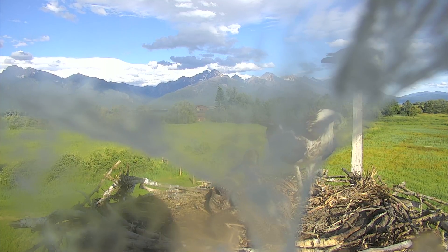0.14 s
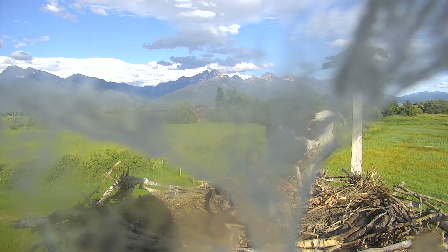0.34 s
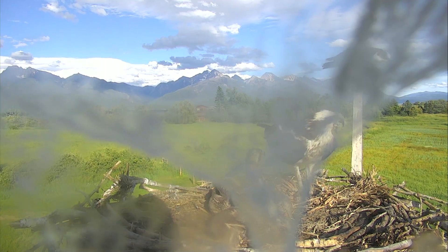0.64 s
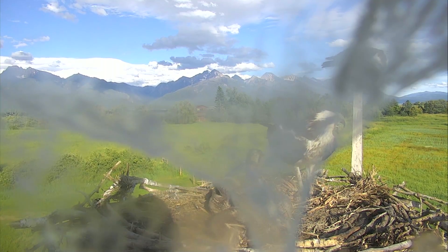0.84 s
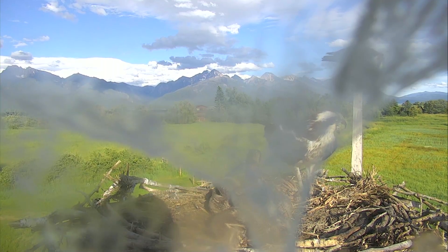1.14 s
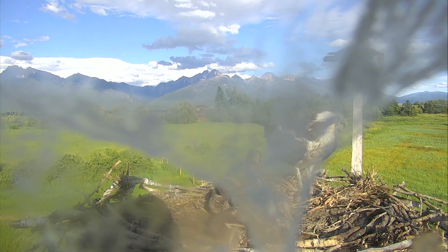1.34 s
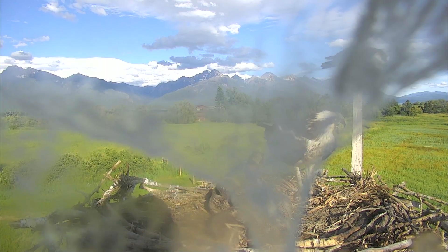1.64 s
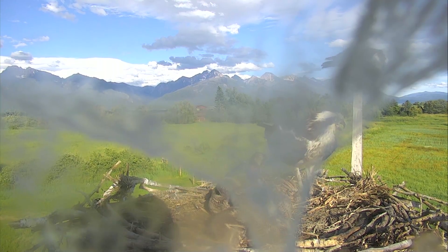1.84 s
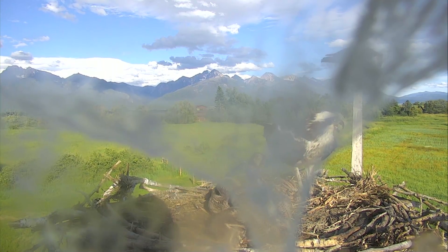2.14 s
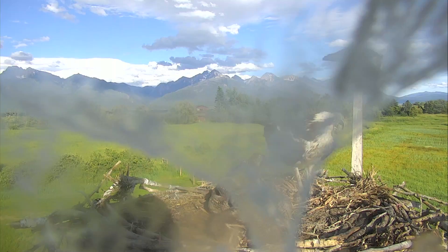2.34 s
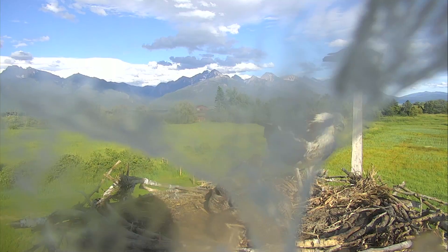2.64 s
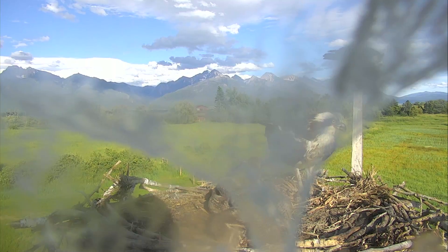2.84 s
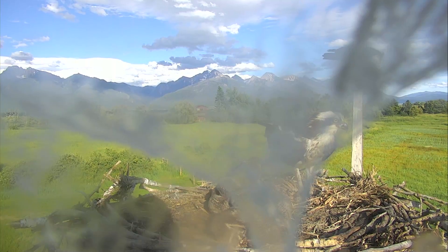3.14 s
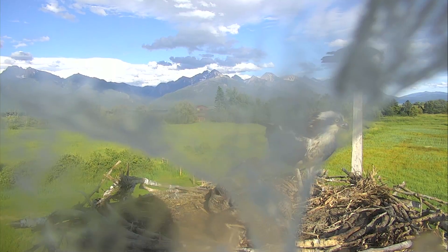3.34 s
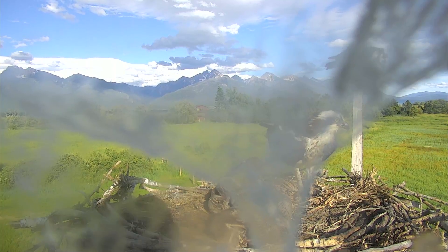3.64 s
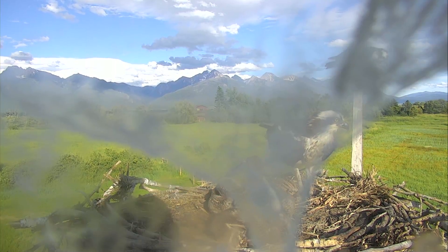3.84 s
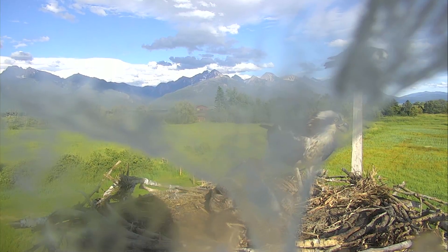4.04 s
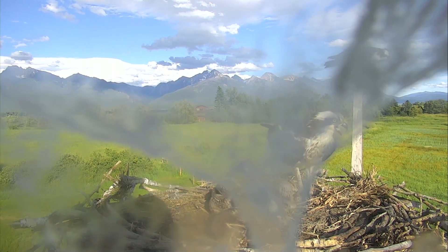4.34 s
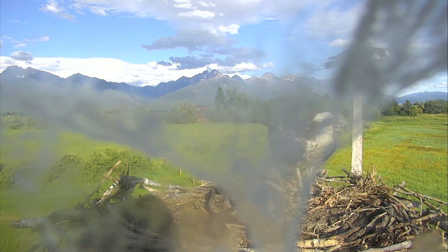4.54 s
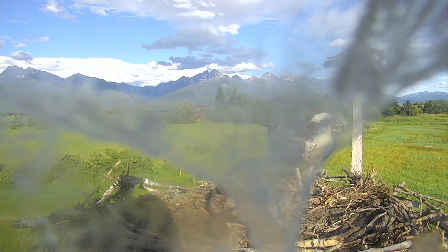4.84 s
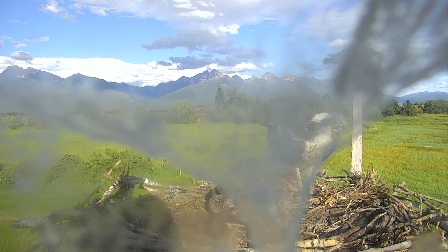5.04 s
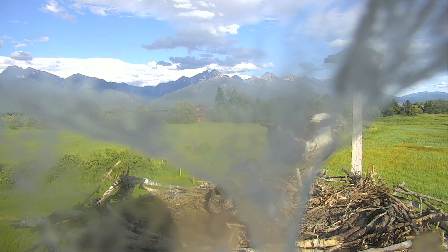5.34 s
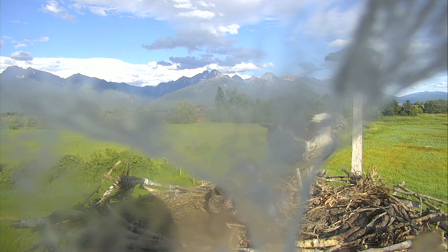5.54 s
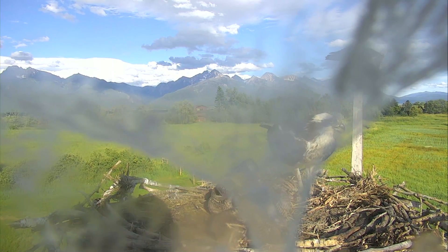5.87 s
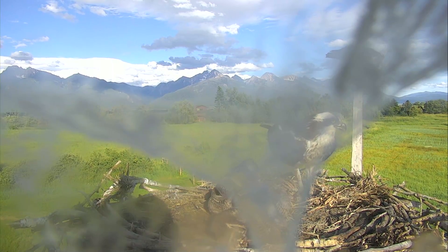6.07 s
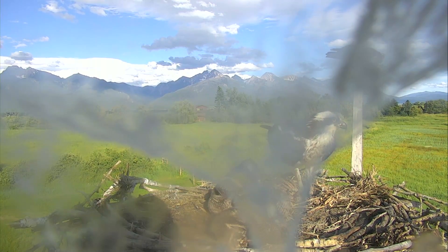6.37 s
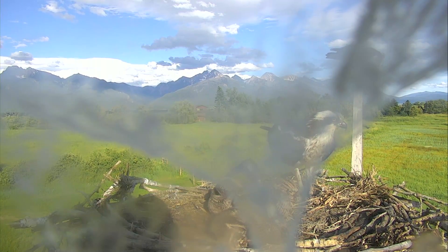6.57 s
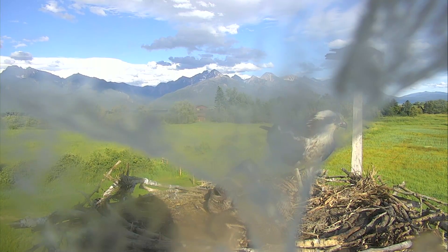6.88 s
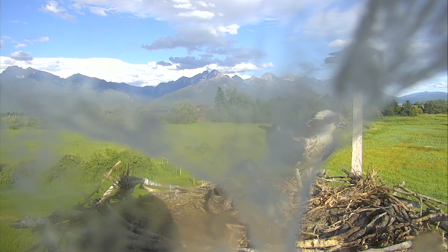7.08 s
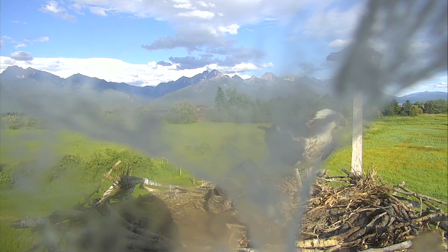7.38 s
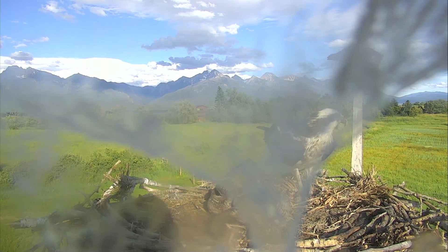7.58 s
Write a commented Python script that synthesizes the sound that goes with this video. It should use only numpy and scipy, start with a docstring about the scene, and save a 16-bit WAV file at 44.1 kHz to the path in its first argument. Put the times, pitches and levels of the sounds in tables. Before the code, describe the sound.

Piercing whistled raptor chirps come in two rapid bouts, the second shorter, separated and followed by tiny twig ticks, far small birds and soft wind rumble.

```python
"""A bird of prey on its nest whistles a first bout of sharp chirps, close by in open country, over faint wind.
In the pause, dry twigs tick and small birds peep far off; then comes a second, shorter bout.
After it, ticks and peeps return, with thin far whistles and one soft low rush of noise.
The chirps add a whistle, its overtones, half-pitch lines and rasp, with pitch leaping between two registers.
Ticks are noise bursts ringing thin sticks, far birds are gliding sines, and wind is shaped random noise."""
import sys
import numpy as np
from scipy import signal
from scipy.fft import rfft, irfft
from scipy.io import wavfile
from scipy.ndimage import uniform_filter1d

SR = 44100
rng = np.random.default_rng(int(sys.argv[2]) if len(sys.argv) > 2 else 0)


def generate_wav(sig):
    """Save sig (samples, or channels by samples) to the path in sys.argv[1] as 16-bit PCM at SR."""
    pcm = np.round(np.clip(np.atleast_2d(sig).T, -1, 1) * 32767).astype(np.int16)
    wavfile.write(sys.argv[1], SR, pcm)


N = 340011

# How the wind changes. Each row: time in seconds, rumble level in dB, open-air wash level in dB before a 1 dB lift.
WIND_LEVELS = [(0.0, -50.5, -61.5), (1.22, -52.5, -62.5), (7.71, -58, -66)]
# Colour of the rumble and of the wash. Each row: frequency in Hz, relative strength in dB per Hz.
RUMBLE_COLOUR = [(12, -24), (25, -1.5), (97, 3.5), (160, -8.5), (260, -22.5), (400, -55)]
WASH_COLOUR = [(120, -32), (200, -0.5), (350, -4.5), (500, -4.5), (630, -7.5), (970, -7.5), (1300, -11.5),
               (2100, -11), (2900, -13), (3400, -23), (4900, -19), (5400, -24.5), (10000, -29.5),
               (17000, -43.5)]
HUM_HZ, HUM_DB = 955, -76  # a thin, nearly steady tone in the wash; the level is its peak

# One soft low rush. In order: middle in seconds, half length in seconds,
# a list of bands (centre in Hz, width in Hz, level in dB), level in dB at its middle.
RUSH = (6.17, 0.27, [(775, 360, 0)], -66)

# Far whistles. Each row: start in seconds, length in seconds, start, middle and end pitch in Hz, relative level in dB.
FAR_WHISTLES = [(6.233, 0.095, 1900, 2365, 1450, -68), (6.565, 0.05, 1750, 1680, 1450, -74),
                (6.79, 0.05, 5550, 5450, 5300, -84)]
# Runs of high peeps. Each row: start in seconds, number of peeps.
PEEP_RUNS = [(2.969, 2), (5.903, 1), (6.134, 1), (6.224, 1), (6.454, 3), (6.849, 2), (7.184, 3)]
# A single peep: length in seconds, start, middle and end pitch in Hz, relative level in dB.
PEEP_SHAPE = (.022, 5800, 5720, 5620, -82)
PEEP_STEP_S = 0.048  # from the start of one peep to the next

# Twig ticks. Each row: time in seconds, relative peak level in dB.
TWIG_TICKS = [(2.6244, -49), (2.6503, -48), (2.692, -45.5), (3.053, -48), (3.0959, -49), (3.3167, -53),
              (3.477, -55), (3.5194, -46), (3.5342, -46), (5.813, -51), (5.8504, -53), (5.8706, -51),
              (6.188, -45), (6.2238, -55), (6.3116, -52), (6.3298, -49.5), (6.3604, -49), (6.397, -53),
              (6.43, -45.5), (6.7451, -52), (6.769, -51)]
# Ringing of a thin dry stick. Each row: frequency in Hz, width in Hz, level in dB.
TWIG_RESONANCES = [(4436, 2500, -8), (7100, 2700, -2), (9730, 6300, -5.5), (13480, 4500, -11)]

# Windpipe and open beak. Each row: frequency in Hz, width in Hz, level in dB.
THROAT_RESONANCES = [(1364, 328, -14), (2416, 170, -1.5), (2640, 433, -4.5), (3450, 560, -10.5),
                     (4220, 100, -28), (4920, 400, -13.5), (5370, 95, -14.5), (6440, 560, -11),
                     (7980, 400, -13.5), (8770, 440, -22), (9470, 470, -25.5), (10250, 1100, -30.5),
                     (10800, 150, -30.5), (12200, 500, -41), (14300, 700, -47), (15600, 1500, -37.5)]
# Side branches of the throat weaken narrow bands. Each row: frequency in Hz, width in Hz.
THROAT_NOTCHES = [(3170, 350), (4480, 510), (5290, 260), (6080, 400), (7350, 200), (8620, 440)]
# Overtones against the whistle, strong in the low register.
# Each row: pitch in Hz, then the 2nd, 3rd, 4th and 5th harmonic in dB, before the lift in steady spells.
OVERTONE_LEVELS = [(1900, -15.5, -19.5, -33, -45.5), (2110, -13, -6.5, -21.5, -35.5),
                   (2180, -17, -7, -28, -38.5), (2335, -16.5, -33.5, -39.5, -54),
                   (2500, -24.5, -27.5, -44.5, -56), (2670, -31, -28, -44, -58.5),
                   (2665, -25, -24, -42.5, -60.5), (2740, -22.5, -34.5, -42.5, -58),
                   (2858, -19.5, -29.5, -42.5, -55.5), (2845, -21, -26.5, -46.5, -52)]
# The rasp grows in the upper register. Each row: pitch in Hz, relative rasp in dB.
RASP_BY_PITCH = [(2150, -18), (2300, -7.5), (2600, -2.5), (2900, -4.5)]

# Long chirps swell, sag and swell again. Each row: start in seconds, leap up in seconds, opening level in dB,
# crest in seconds, its Hz, its dB, steady until in seconds, relative half-pitch level in dB, relative rasp in dB,
# sag in seconds, its Hz, its dB, second crest in seconds, its Hz, its dB, leap down in seconds.
LONG_CHIRPS = [(0.109, 0.126, -22.5, 0.17, 2913, -21, 0.18, -18.5, -30, 0.2, 2696, -24, 0.31, 2895, -20.5, 0.347),
               (0.463, 0.48, -22.5, 0.515, 2879, -19.5, 0.54, -20.5, -29, 0.563, 2780, -26, 0.65, 2913, -21, 0.703),
               (0.802, 0.82, -20, 0.858, 2928, -20, 0.88, -18.5, -28, 0.89, 2830, -22.5, 0.962, 2918, -20, 0.997),
               (1.095, 1.111, -21, 1.15, 2865, -17.5, 1.176, -21.5, -30.5, 1.174, 2713, -22.5, 1.255, 2862, -20.5, 1.321),
               (1.433, 1.448, -23, 1.491, 2822, -19.5, 1.5, -21.5, -29, 1.544, 2673, -26, 1.72, 2854, -21.5, 1.766),
               (1.899, 1.916, -24.5, 1.952, 2835, -19.5, 1.969, -21.5, -29.5, 2.007, 2580, -27.5, 2.07, 2830, -21.5, 2.137),
               (2.254, 2.271, -23.5, 2.305, 2830, -19, 2.319, -20.5, -29, 2.346, 2678, -25, 2.54, 2850, -20.5, 2.577),
               (4.317, 4.332, -23, 4.371, 2700, -16.5, 4.395, -35.5, -31.5, 4.407, 2578, -23, 4.47, 2702, -21, 4.511),
               (4.603, 4.621, -23, 4.66, 2777, -18, 4.666, -25.5, -31, 4.7, 2610, -25.5, 4.79, 2825, -19.5, 4.839),
               (5.136, 5.155, -22, 5.192, 2842, -16, 5.26, -28.5, -31, 5.222, 2773, -20.5, 5.295, 2885, -18.5, 5.328),
               (5.43, 5.449, -20, 5.483, 2860, -17, 5.5, -29.5, -30.5, 5.516, 2790, -24, 5.685, 2877, -19, 5.746)]
# Short chirps are one swell. Each row: start in seconds, leap up in seconds, opening level in dB,
# crest in seconds, its Hz, its dB, steady until in seconds, relative half-pitch level in dB, relative rasp in dB,
# leap down in seconds, closing level in dB, closing pitch in Hz, pitch after the leap down in Hz, end in seconds.
SHORT_CHIRPS = [(-0.09, -0.075, -22, 0.002, 2720, -19, -0.02, -30, -36, 0.015, -22, 2500, 2240, 0.027),
                (3.981, 3.982, -38, 4.031, 2518, -20.5, 4.062, -36, -33, 4.067, -31, 2330, 2290, 4.076),
                (4.144, 4.157, -27, 4.205, 2665, -16.5, 4.23, -32, -37, 4.244, -28, 2400, 1930, 4.254),
                (4.944, 4.963, -24, 5.003, 2773, -18, 5.019, -28, -29, 5.033, -27, 2610, 2200, 5.047)]
# Drops into the low register at the sag. Each row: from in seconds, its Hz, its dB, to in seconds, its Hz, its dB,
# pitch on return in Hz, relative half-pitch level in dB.
REGISTER_BREAKS = [(0.567, 2320, -26.5, 0.602, 2390, -23, 2818, -27),
                   (1.546, 2350, -25.5, 1.584, 2344, -24.5, 2737, -36),
                   (2.009, 2275, -29.5, 2.039, 2350, -23, 2796, -36),
                   (5.23, 2310, -27, 5.273, 2398, -19.5, 2870, -36),
                   (5.518, 2315, -26, 5.617, 2360, -21.5, 2766, -29)]
# Low-register opening. Each row: share of its length, share of the crest pitch, highest level in dB.
LEAD_IN_PATH = [(0, 0.71, -56), (0.4, 0.725, -31.5), (1, 0.81, -24.5)]
# Low register again at the end, sliding down; TAIL_DB is the loudest it may begin
TAIL_HZ, TAIL_DB, TAIL_S, TAIL_HZ_PER_S, TAIL_FALL_DB = 2236, -26, 0.017, 26000, 20
SCOOP_HZ, SCOOP_S, RISE_HZ = 165, 0.006, 90  # pitch slides up after the leap, then climbs to the crest
DROOP_HZ, DROOP_DB, DROOP_S, EASE_HZ = 330, 4.5, 0.009, 50  # pitch and level give way before the leap down
BOW_HZ, BOW_DB, BOW_BACK = 1.7, 1.9, 1.7  # roundness of the swells (1 = straight)
SETTLE_S = 0.011  # the steady spell starts this long after the leap up
SLIP_HZ, SLIP_S = 240, 0.005  # pitch slips just before a break and curls up at its end
LATE_HALF_DB, LATE_HALF_S = -6.5, 0.04  # the half pitch returns faintly near the end of a long chirp


def gain_of(db):
    """Turns decibels into amplitude."""
    return 10 ** (np.asarray(db) / 20)


def evened(x):
    """Scales a sound to an average (rms) strength of 1."""
    return x / np.sqrt(np.mean(x ** 2) + 1e-20)


def read(points, hz):
    """Reads a curve between its points, along a log-frequency axis."""
    f, value = np.transpose(points)
    return np.interp(np.log(hz + 1), np.log(f + 1), value)


def add(mix, s, sound):
    """Mixes a sound in at s seconds, or at the very start if s is negative."""
    part = mix[max(round(s * SR), 0):][:len(sound)]
    part += sound[:len(part)]


def response(modes, hz):
    """Sums resonances, each applied twice so that the valleys between them stay dark."""
    return sum(gain_of(db) / (1 + 2j * (hz - f) / w) ** 2 for f, w, db in modes)


def coloured(x, shape):
    """Passes a sound through a frequency response."""
    size = 2 * len(x)  # silence after the sound leaves room for ringing
    hz = np.fft.rfftfreq(size, 1 / SR)
    return irfft(rfft(x, size) * shape(hz))[:len(x)]


def wander(count, size):
    """Draws a smooth random curve, scaled to rms 1 before it is cut to length."""
    drawn = rng.standard_normal(max(count, SR // 2))
    smooth = uniform_filter1d(uniform_filter1d(drawn, size), size)
    return evened(smooth)[:count]


def air(shape, patchy_db):
    """Moving air: random short-time spectra whose strength drifts in patches."""
    frames, hz = N // 512 + 5, np.fft.rfftfreq(2048, 1 / SR)
    a, b, patches = rng.standard_normal((frames, 1025, 3)).T
    patches = uniform_filter1d(patches, size=14, axis=0)  # across frequency
    patches = evened(uniform_filter1d(patches, size=6, axis=1))  # across time
    spectra = (a + 1j * b) * gain_of(read(shape, hz)[:, None] + patchy_db * patches)
    return evened(signal.istft(spectra, nperseg=2048, noverlap=1536)[1][:N])


def wind():
    """Lumpy rumble on the microphone, a thin tone, and a wide wash of moving air."""
    s, rumble_db, wash_db = np.transpose(WIND_LEVELS)
    t = np.arange(N) / SR
    rumble = gain_of(np.interp(t, s, rumble_db)) * air(RUMBLE_COLOUR, patchy_db=2.5)
    hum_hz = HUM_HZ + 4 * wander(N, size=2000)
    hum = gain_of(HUM_DB) * np.sin(2 * np.pi * np.cumsum(hum_hz) / SR)
    wash = gain_of(np.interp(t, s, wash_db) + 1.0) * air(WASH_COLOUR, patchy_db=0.94)
    return rumble + hum + wash


def rush():
    """A soft low band of noise that swells and fades once."""
    middle, half_s, band, db = RUSH
    noise = evened(coloured(rng.standard_normal(N), lambda hz: response(band, hz)))
    t = np.arange(N) / SR
    return gain_of(db) * np.exp(-((t - middle) / half_s) ** 2) * noise


def far_birds():
    """Thin gliding whistles and short high peeps, each a sine that fades in and out."""
    out = np.zeros(N)
    peeps = [(s + k * PEEP_STEP_S, *PEEP_SHAPE) for s, count in PEEP_RUNS for k in range(count)]
    for s, length, a, b, c, db in FAR_WHISTLES + peeps:
        u = np.linspace(0, 1, round(length * SR))
        hz = a + (4 * b - 3 * a - c) * u + (2 * a + 2 * c - 4 * b) * u ** 2  # arch through three pitches
        note = np.sin(np.pi * u) * np.sin(2 * np.pi * np.cumsum(hz) / SR)
        add(out, s, gain_of(db + 6.5) * note)
    return out


def twig(hz):
    """Ring of a thin dry stick, as a sum of resonances."""
    return response(TWIG_RESONANCES, hz)


def twigs():
    """Dry ticks, each a tiny noise burst ringing thin sticks, plus single stray taps at random times."""
    bursts = rng.standard_normal((len(TWIG_TICKS), 300)) * np.exp(-np.arange(300) / 19.0)
    out = np.zeros(N)
    for (s, db), burst in zip(TWIG_TICKS, bursts):
        tick = coloured(burst, twig)
        add(out, s, gain_of(db + 2.5) * tick / abs(tick).max())
    stray = (rng.random(N) < 9. / SR) * rng.standard_normal(N)  # about nine a second
    return out + gain_of(-65.0) * coloured(stray, twig)


def meadow(x):
    """Faint late returns from trees and ground: sparse echoes that die away."""
    taps = np.zeros(SR)
    at = np.arange(1200, SR - 20, 20) + rng.integers(0, 20, (SR - 1201) // 20)
    taps[at] = rng.choice([-1., 1.], len(at)) * gain_of(-60 * at / SR / .65)  # 60 dB down in 0.65 s
    return signal.fftconvolve(x, taps / np.linalg.norm(taps))[:N]


def throat(hz):
    """Resonances of the throat, weakened in narrow bands by its side branches."""
    notches = [1 - .93 / (1 + 2j * (hz - f) / w) for f, w in THROAT_NOTCHES]
    return response(THROAT_RESONANCES, hz) * np.prod(notches, axis=0)


def chirp(t, db, pitch, steady, rasp_db, half):
    """One vibrating membrane makes the whistle, overtones and half-pitch lines, and leaks air as rasp."""
    count = len(t)
    level_db = uniform_filter1d(db, size=90)
    hz = uniform_filter1d(pitch, size=50)
    hoarse = gain_of(rasp_db + 23 + read(RASP_BY_PITCH, hz) - 3.7 * steady)  # how unsteady the vibration is
    shake = hoarse * gain_of(-9 * steady)  # the whistle itself smooths out in steady spells
    jitter = 0.549 * wander(count, size=70) + 1.1 * wander(count, size=250)
    phase = 2 * np.pi * np.cumsum(hz) / SR + shake * jitter
    tone = (1 + 0.42 * shake * wander(count, size=70)) * np.cos(phase)

    blur = 1 + 0.8 * hoarse * wander(count, size=45)  # uneven strength of the overtones
    at, *orders_db = np.transpose(OVERTONE_LEVELS)
    orders_db = orders_db + [orders_db[-1] - 5.0]  # the 6th harmonic follows the 5th
    for k, order_db in enumerate(orders_db, start=2):
        overtone_db = np.interp(hz, at, order_db) + 2.3 * k * steady
        tone += blur * gain_of(overtone_db) * np.sin(k * phase)

    # a doubled period puts extra lines halfway between the harmonics
    for k in range(6):
        order = k + .5
        colour = abs(response(THROAT_RESONANCES, order * hz)) ** 0.61
        tone += half * gain_of(12.0 - 1.5 * k) * colour * np.cos(order * phase)

    flutter = gain_of(2.2 * wander(count, size=300))  # the leak comes and goes
    puffs = flutter * (1 + .8 * np.cos(phase)) * rng.standard_normal(SR // 2)[:count]  # air leaks once a cycle
    rasp = hoarse * evened(coloured(puffs, throat))
    fade = np.minimum(1, (t[-1] - t) / 0.0011)
    return np.sqrt(2) * gain_of(level_db) * (tone + 0.61 * rasp) * fade


def spell(t, a, b):
    """1 between times a and b, with soft edges."""
    return np.clip(np.minimum(t - a, b - t) / .015 + .5, 0, 1)


def swell(t, low_s, low, top_s, top, bow):
    """Rounded climb from a low point to a top, either way in time."""
    away = np.clip((t - top_s) / (low_s - top_s), 0, 1)
    return top + (low - top) * away ** bow


def phrase(start, up, open_db, crest, crest_hz, crest_db, calm, down, tail_hz, end, after_hz, after_db):
    """Low lead-in, leap to the upper register, swell to the crest and what follows it, leap down, low tail."""
    t = np.arange(start, end, 1 / SR)
    hz = np.where(t < crest, swell(t, up, crest_hz - RISE_HZ, crest, crest_hz, BOW_HZ), after_hz(t))
    db = np.where(t < crest, swell(t, up, open_db, crest, crest_db, BOW_DB), after_db(t))
    hz = hz - SCOOP_HZ * np.exp(-abs(t - up) / SCOOP_S)

    share, pitch_share, lead_db = np.transpose(LEAD_IN_PATH)
    lead = (t - start) / (up - start)
    low_hz = crest_hz * np.interp(lead, share, pitch_share)
    low_db = np.minimum(np.interp(lead, share, lead_db), open_db + 1.5)

    tail = abs((t - down) / (end - down)) ** 1.1
    slide_hz = tail_hz - TAIL_HZ_PER_S * (t - down)
    fall_db = np.minimum(TAIL_DB, after_db(down)) - TAIL_FALL_DB * tail

    hz = np.select([t < up, t > down], [low_hz, slide_hz], hz)
    db = np.select([t < up, t > down], [low_db, fall_db], db)
    return t, db, hz, spell(t, up + SETTLE_S, calm)


def short_chirp(start, up, open_db, crest, crest_hz, crest_db, calm, half_db, rasp_db, down, close_db, close_hz,
                tail_hz, end):
    """One swell that fades into the leap down."""
    t, db, hz, steady = phrase(start, up, open_db, crest, crest_hz, crest_db, calm, down, tail_hz, end,
                               lambda t: swell(t, down, close_hz, crest, crest_hz, 3.0),
                               lambda t: swell(t, down, close_db, crest, crest_db, 3.1))
    return chirp(t, db, hz, steady, rasp_db, gain_of(half_db) * steady)


def long_chirp(start, up, open_db, crest, crest_hz, crest_db, calm, half_db, rasp_db, sag, sag_hz, sag_db, late, late_hz,
               late_db, down):
    """Two swells; a break at the sag, if there is one, holds the low register until the second begins."""
    broken = [row for row in REGISTER_BREAKS if start < row[0] < down]
    no_break = (sag, sag_hz, sag_db) * 2 + (sag_hz, half_db)
    a, a_hz, a_db, b, b_hz, b_db, back_hz, low_half_db = broken[0] if broken else no_break

    def path(t, top, dip, low_a, low_b, back, last, bow, ease, slip, droop):
        """Crest to sag, break, return to the second crest, ease, droop."""
        first = swell(t, sag, dip, crest, top, bow) - len(broken) * slip * np.exp(-abs(a - t) / SLIP_S)
        low = np.interp(t, [a, b], [low_a, low_b]) + 0.55 * slip * np.exp(-abs(b - t) / SLIP_S)
        easing = last - ease * (t - late) / (down - late)
        second = np.where(t < late, swell(t, b, back, late, last, BOW_BACK), easing)
        joined = np.select([t < a, t < b], [first, low], second)
        return joined - droop * np.exp(-abs(down - t) / DROOP_S)

    t, db, hz, steady = phrase(
        start, up, open_db, crest, crest_hz, crest_db, calm, down, TAIL_HZ, down + TAIL_S,
        lambda t: path(t, crest_hz, sag_hz, a_hz, b_hz, back_hz, late_hz, BOW_HZ, EASE_HZ, SLIP_HZ, DROOP_HZ),
        lambda t: path(t, crest_db, sag_db, a_db, b_db, b_db, late_db, BOW_DB, 0, 0, DROOP_DB))
    late_half = gain_of(LATE_HALF_DB) * spell(t, down - LATE_HALF_S - .015, down - .015)
    low_half = len(broken) * gain_of(low_half_db) * spell(t, a + 0.0057, b - .007)
    half = gain_of(half_db) * (steady + late_half) + low_half
    return chirp(t, db, hz, steady, rasp_db, half)


def bird():
    """All chirps; each that starts after time zero opens with a soft low click as the membrane lets go."""
    out = np.zeros(N)
    u = np.arange(200) / SR / .00016
    click = gain_of(-31.5) * u * (2 - u) * np.exp(-u)
    for rows, call in ((LONG_CHIRPS, long_chirp), (SHORT_CHIRPS, short_chirp)):
        for row in rows:
            start = row[0]
            skipped = max(round(-start * SR), 0)  # samples that lie before time zero
            add(out, start, call(*row)[skipped:])
            if start > 0:
                add(out, start + 0.00061, click)
    return out


def scene():
    """Adds up wind, low rush, far birds, twigs, and the bird with its faint echo."""
    voice = bird()
    echo = gain_of(-39.0) * meadow(voice)
    return (voice + echo + twigs() + far_birds() + wind() + rush())[None]


def record(dry):
    """The band limit of the recorder: a steep filter removes what lies above 17300 Hz."""
    low_pass = signal.firwin(511, 17300, window=("kaiser", 9), fs=SR)
    return signal.oaconvolve(dry, low_pass[None], "same")


dry = scene()
out = record(dry)
generate_wav(out)
```